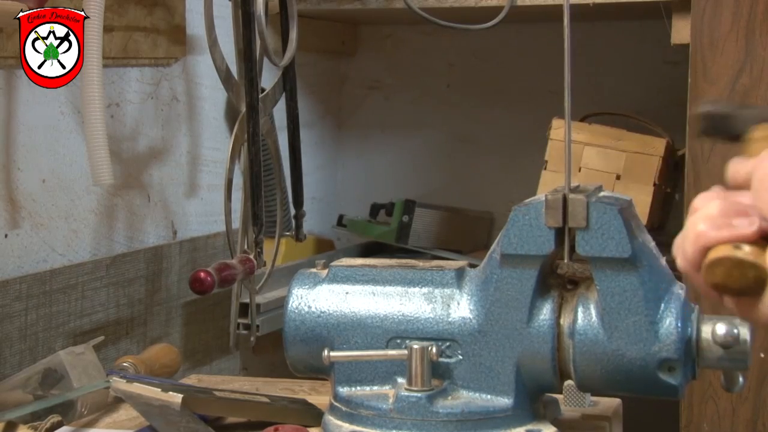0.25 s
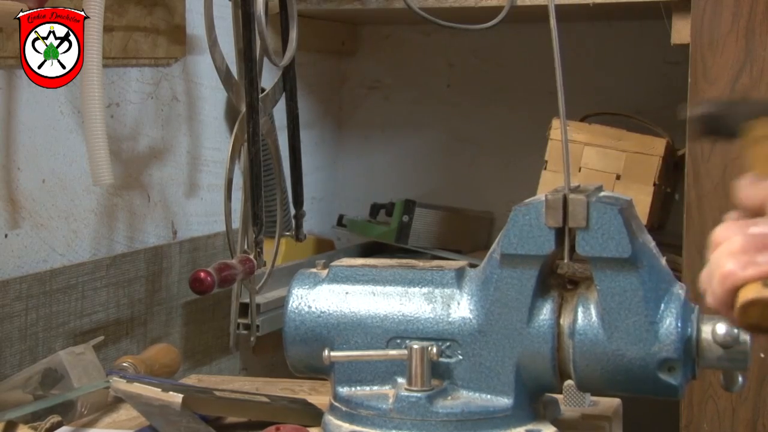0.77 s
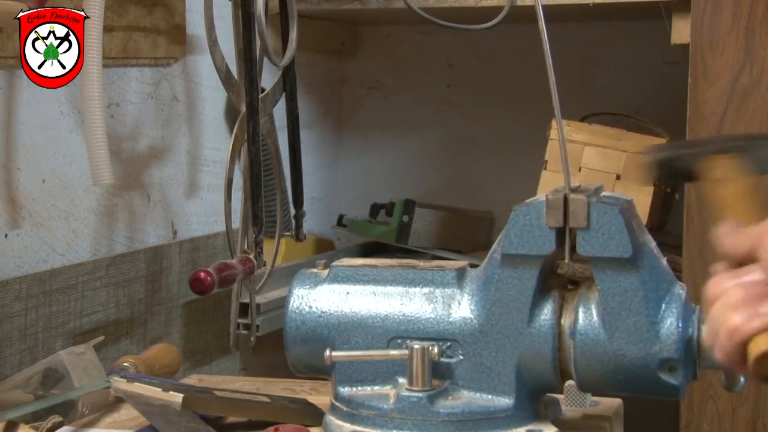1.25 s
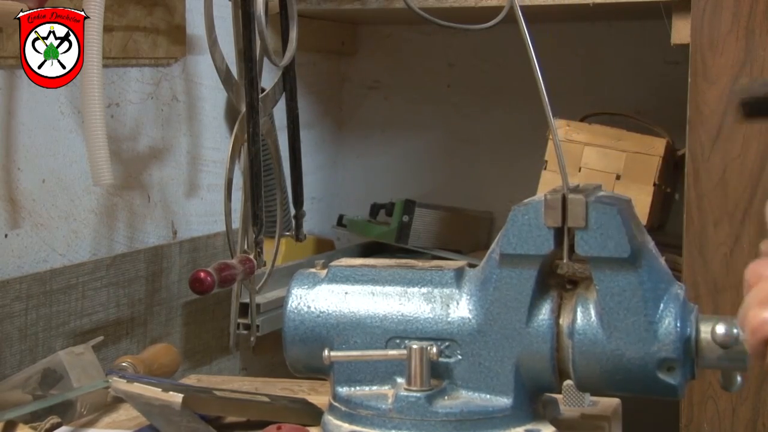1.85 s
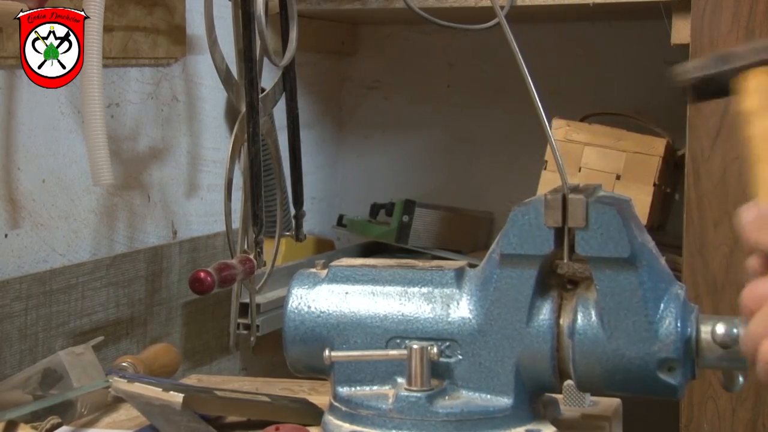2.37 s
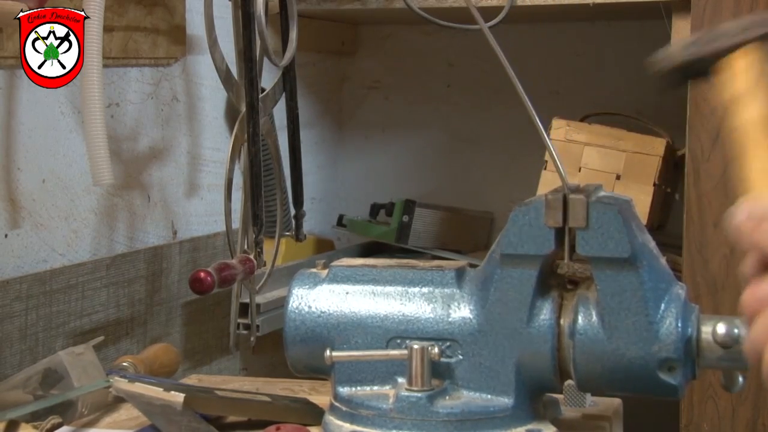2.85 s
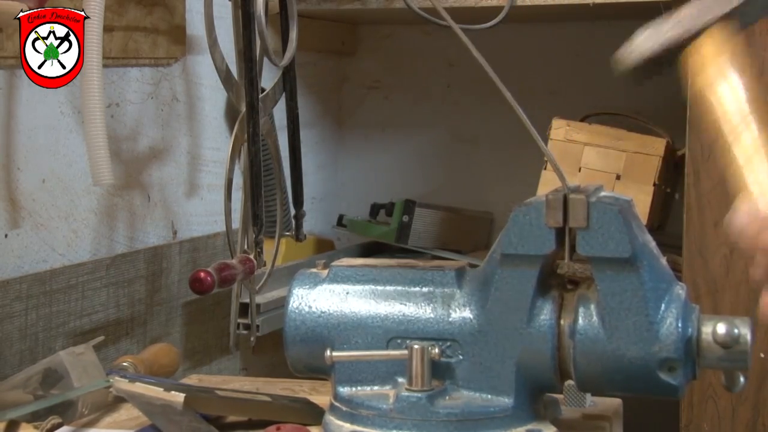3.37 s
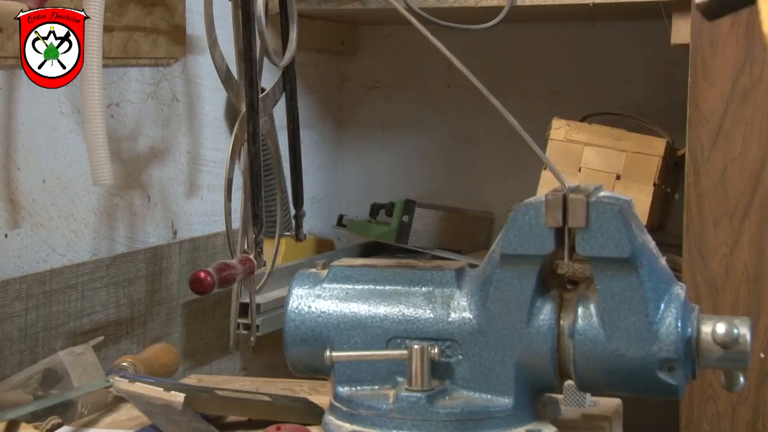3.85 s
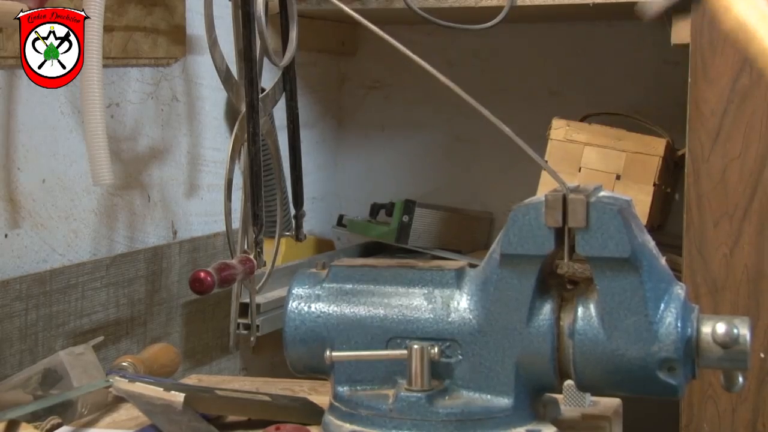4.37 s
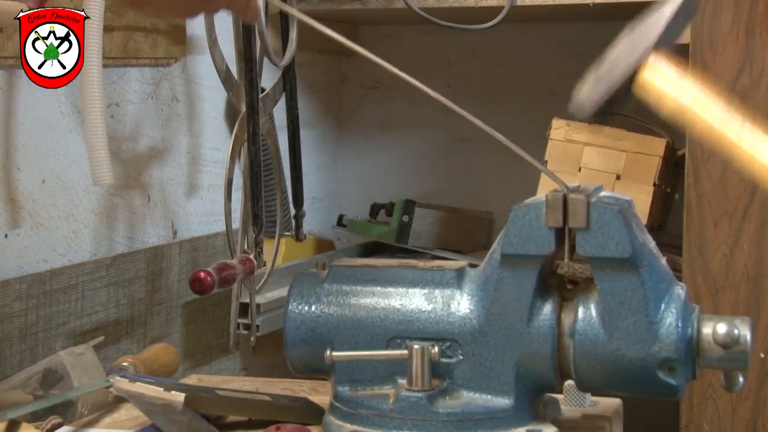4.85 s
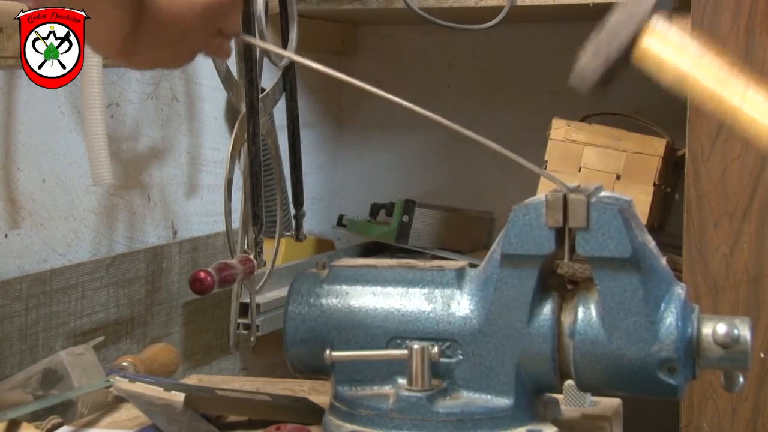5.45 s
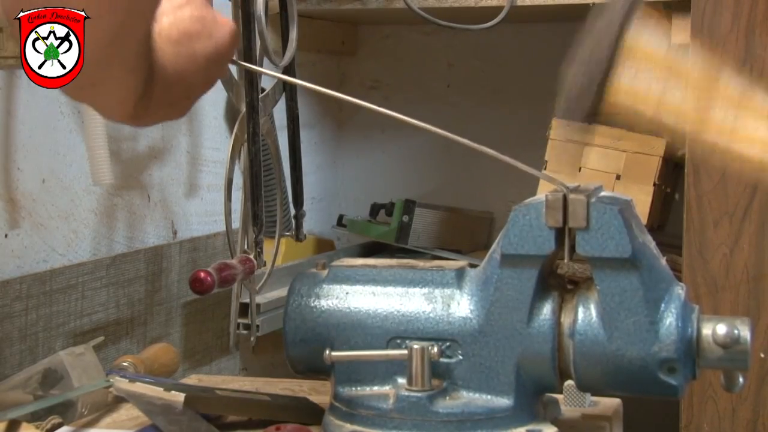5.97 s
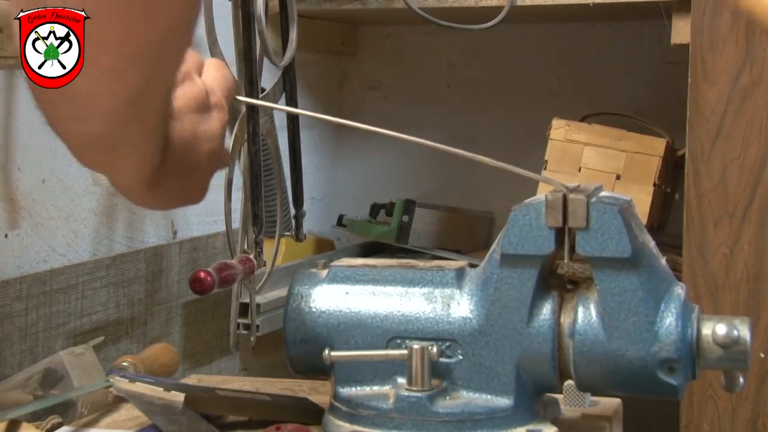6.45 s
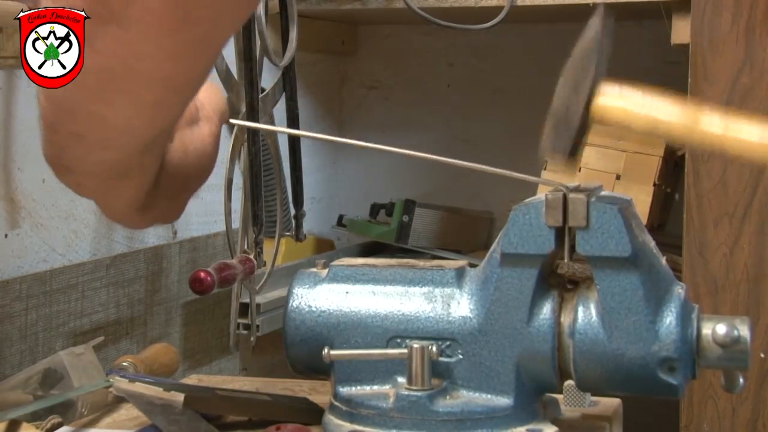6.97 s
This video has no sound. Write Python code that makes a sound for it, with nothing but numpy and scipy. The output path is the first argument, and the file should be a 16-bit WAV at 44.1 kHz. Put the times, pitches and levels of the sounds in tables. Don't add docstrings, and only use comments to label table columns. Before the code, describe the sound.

A steel hammer beats a thin rod clamped in a bench vise, about four sharp clanking blows per second, loose tools rattling, ending flatter and heavier.

```python
import sys
import numpy as np
from scipy import signal
from scipy.fft import rfft, irfft
from scipy.io import wavfile

SR = 44100
rng = np.random.default_rng(int(sys.argv[2]) if len(sys.argv) > 2 else 0)


def level_to_linear(level):
    exponent = np.asarray(level, float) / 20
    return 10 ** exponent


def file_out(sig):
    cols = np.atleast_2d(sig).T
    lim = np.clip(cols, -1, 1)
    pcm = np.round(lim * 32767).astype(np.int16)
    wavfile.write(sys.argv[1], SR, pcm)


N = 318402
LEAD = SR // 4

# start_s, slide_clank_db, vise_knock_db, crack_db
HAMMER_BLOWS = [(0.194, -9.5, -22.5, -22.5), (0.479, -7, -20.5, -20.5), (0.75, -10.5, -21, -22),
                (1.025, -11.5, -22, -25), (1.282, -16, -29, -27), (1.549, -13, -25, -26),
                (1.805, -17, -28, -25.5), (2.059, -17, -27, -25.5), (2.29, -18.5, -28, -26.5),
                (2.519, -18, -28, -24), (2.752, -13, -22.5, -23), (2.99, -9, -20, -22.5),
                (3.241, -15.5, -23.5, -23.5), (3.506, -15.5, -27, -25.5), (3.78, -11.5, -22, -22.5),
                (4.034, -12, -21, -22), (4.318, -11.5, -24, -22.5), (4.613, -9.5, -18.5, -20.5),
                (4.887, -8, -17, -19.5), (5.176, -8.5, -20, -20), (5.475, -8, -16, -21),
                (5.761, -7, -15, -21.5), (6.077, -10, -17.5, -23), (6.41, -4, -17, -20.5),
                (6.735, 0, -15.5, -20), (7.054, -0.5, -14.5, -20)]
# start_s, slide_clank_db, vise_knock_db, crack_db
BLOW_BEFORE = [
    (-0.056, -30, -44, -45),
]


def at_hz(points, hz):
    table_hz, values = np.transpose(points)
    return np.interp(np.log(hz), np.log(table_hz), values)


def colour(x, points):
    hz = np.maximum(np.fft.rfftfreq(4096, 1 / SR), 1)
    cepstrum = irfft(np.log(level_to_linear(at_hz(points, hz))))
    fold = cepstrum * np.r_[1, 2 * np.ones(2047), 1, np.zeros(2047)]
    impulse = irfft(np.exp(rfft(fold)))
    return signal.oaconvolve(np.atleast_2d(x), impulse[None], axes=1)[:, :x.shape[-1]]


def band(x, low_hz, high_hz):
    return signal.sosfilt(signal.butter(2, [low_hz, high_hz], "band", fs=SR, output="sos"), x)


def top_cut(x):
    return signal.sosfilt(signal.cheby2(10, 55, 15700, fs=SR, output="sos"), x)


def swell(x, seconds):
    r = np.exp(-1 / (seconds * SR))
    return signal.lfilter([1 - r], [1, -r], x)


def ring(clicks, hz, t60):
    r, w = level_to_linear(-60 / (max(t60, .003) * SR)), 2 * np.pi * hz / SR
    return signal.lfilter([0, np.sin(w)], [1, -2 * r * np.cos(w), r * r], clicks + 1e-18)


def strikes(times, heights):
    out = np.zeros(N + LEAD)
    np.add.at(out, np.round(np.asarray(times) * SR).astype(int) + LEAD, heights)
    return out


def dying(times, heights, t60):
    return signal.lfilter([1], [1, -level_to_linear(-60 / (t60 * SR))], strikes(times, heights) + 1e-18)


def grains(per_s, spread_db):
    sizes = level_to_linear(spread_db * np.minimum(rng.exponential(1, N + LEAD), 4))
    sizes = sizes * rng.choice([-1, 1], N + LEAD)
    clicks = sizes * (rng.random(N + LEAD) < per_s / SR)
    return clicks / clicks.std()


def work(s):
    # time_s, rod_bend [0-1], rod_and_tool_looseness_db, hammer_ring_against_crack_db
    states = [(-0.09, 1, -12.5, -14.5), (0.2, 0.28, -2, -22.5), (0.75, 0.22, -1.5, -6),
              (1.28, 0.14, 7.5, 2), (1.95, 0.35, 9, 6.5), (2.3, 0.03, 4, 2.5), (2.9, 0.39, -8, 2),
              (3.5, 0.24, -0.5, -3), (4.1, 0.41, -2, -19.5), (4.9, 0.6, -9, -27), (6.1, 0.59, -11, -25.5),
              (7.06, 0.97, -9.5, -21)]
    state_s, *columns = np.transpose(states)
    return [np.interp(s, state_s, column) for column in columns]


def swing_hammer():
    s, clank_db, knock_db, crack_db = np.transpose(BLOW_BEFORE + HAMMER_BLOWS)
    bend, loose_db, ring_db = work(s)
    chance = rng.standard_normal((len(s), 2))
    return dict(
        s=s + .0003,
        clank_db=clank_db, knock_db=knock_db, crack_db=crack_db, bend=bend, loose_db=loose_db,
        head_db=crack_db + ring_db,
        thud_db=-13 + 0.6 * (clank_db + knock_db) / 2 - 10 * bend,
        shudder_db=-4.5 + 0.28 * loose_db - 5 * bend,
        rebound_db=-9 + 0.27 * loose_db - 19 * bend,
        rebound_s=.031 + 0.011 * bend + 0.0053 * chance[:, 0],
        bright_db=7 - 13 * bend - 2.2 * chance[:, 1],
        chatter=grains(2500, 1.7))


def shudder(blow, level_db, t60):
    beats = dying(blow["s"] + 0.0078, level_to_linear(level_db + blow["shudder_db"]), t60)
    rebound_s = blow["s"] + blow["rebound_s"] - .003
    rebound = dying(rebound_s, level_to_linear(level_db + blow["rebound_db"] + 5.5), 0.045)
    return beats + swell(rebound, .003)


def wide_noise(width):
    return rng.standard_normal((2, N + LEAD)) * [[1], [width]]


def burst(blow, level_db, t60, width):
    return wide_noise(width) * swell(dying(blow["s"], level_to_linear(level_db), t60), 0.0016)


def body(modes, times, level_db, after, scatter_db, width):
    scatter = rng.standard_normal((len(times), len(modes)))
    aims, out = width * rng.standard_normal(len(modes)), 0
    for k, (hz, mode_db, t60) in enumerate(modes):
        hit = strikes(times, level_to_linear(level_db + scatter_db * scatter[:, k]))
        tone = (-1) ** (k // 2) * level_to_linear(mode_db) * ring(hit + after, hz, t60)
        side = aims[k] * np.roll(tone, int(SR / hz / 6))
        out = out + np.array([tone, side])
    return out


def still_air():
    # pitch_hz, level_db [dB per Hz]
    hush = [(40, -8), (150, -1.5), (500, -10.5), (1200, -8.5), (3400, -23.5), (8000, -18.5), (14000, -35.5)]
    common, own = rng.standard_normal(N + LEAD), rng.standard_normal((2, N + LEAD))
    air = colour(common + .4 * own, hush)
    return air / air.std()


def spark(blow):
    spark_db = blow["crack_db"] + blow["bright_db"] + .6 * blow["loose_db"] - 7
    return band(burst(blow, spark_db, .006, width=.15), 13800, 16800)


def crack(blow):
    # pitch_hz, level_db
    crack_curve = [(700, -4), (1500, 1.5), (3000, 1.5), (5000, 1.5), (8000, 2), (13000, -11.5),
                   (15000, -19), (16500, -28)]
    crack_db = blow["crack_db"]
    buzz = wide_noise(.25) * shudder(blow, crack_db - 2.5, 0.19)
    slap = colour(burst(blow, crack_db + 3.5, 0.03, width=.25) + buzz, crack_curve)
    spit = band(burst(blow, crack_db + blow["bright_db"] + 8, 0.017, width=.15), 9500, 13000)
    return slap + spit


def jaws(blow):
    # pitch_hz, level_db, t60_s
    jaw_modes = [(2690, -3, 0.054), (2940, -5, 0.049), (3260, -3.5, .02), (4208, -2, .03),
                 (6060, -0.5, .012), (6716, -2.5, 0.028)]
    after = blow["chatter"] * shudder(blow, blow["crack_db"] - 27, 0.18)
    return body(jaw_modes, blow["s"] + 0.00079, blow["crack_db"] - 6, after, scatter_db=-2.0, width=.25)


def slide(blow):
    # pitch_hz, level_db, t60_s
    slide_modes = [(920, 6.5, 0.016), (1064, -8.5, 0.014), (1168.5, 1.5, 0.014), (1330, -1, 0.019),
                   (1640, -8.5, 0.027), (1734, -3.5, 0.017), (1833, -5, 0.029)]
    after = blow["chatter"] * shudder(blow, blow["clank_db"] - 34, 0.14)
    return body(slide_modes, blow["s"] + 0.00083, blow["clank_db"] - 22, after, scatter_db=0.5, width=0.43)


def clank(blow):
    return band(burst(blow, blow["clank_db"], 0.036, width=0.52), 800, 2200)


def vise(blow):
    # pitch_hz, level_db, t60_s
    vise_modes = [(429.6, 2.5, 0.04), (461, -15.5, 0.078), (532.5, -0.5, 0.061), (591.4, 0, 0.04),
                  (658.5, -4, 0.03), (753, 0, 0.03), (849, -4, 0.047)]
    knock_db = blow["knock_db"]
    knock = band(burst(blow, knock_db + 12.5, 0.031, width=0.16), 400, 860)
    after = blow["chatter"] * shudder(blow, knock_db - 24, 0.23)
    return knock + body(vise_modes, blow["s"] + 0.00096, knock_db - 2, after, scatter_db=1.5, width=0.4)


def hammer_head(blow):
    # pitch_hz, level_db, t60_s
    head_modes = [(4270, -6, .03), (6900, -9, .015), (7910, -11, .025), (8350, -4, .022), (9060, -5, .03),
                  (9140, -3, .09), (9165, -13, .16), (10300, -13, .015), (11500, -12, .015)]
    after = blow["chatter"] * shudder(blow, blow["head_db"] - 32, 0.021)
    return body(head_modes, blow["s"] + 0.0012, blow["head_db"] - 0.5, after, scatter_db=-1.5, width=.1)


def bench(blow):
    # pitch_hz, level_db, t60_s
    bench_modes = [(66, -30, .3), (106, -20, .16), (135, -19, .14), (193, -2.5, .13), (222, -10, .15),
                   (254, 0, .14), (290, -7, .16), (316, -6, .14), (350, -3, .14), (385, -4, .13)]
    thud_db = blow["thud_db"]
    after = blow["chatter"] * shudder(blow, thud_db - 31.5, 0.26)
    thud = body(bench_modes, blow["s"] + .0015, thud_db + 0.5, after, scatter_db=0.5, width=0.22)
    rumble = band(burst(blow, thud_db - 12 * blow["bend"] + 4, .4, width=.2), 40, 160)
    return signal.lfilter([.05], [1, -.95], thud) + rumble


def rattle():
    # start_s, level_db
    shakes = [
        (1.2, -60),
        (1.43, -58),
        (1.96, -55),
        (2.03, -60),
        (2.25, -55),
        (2.46, -62),
        (3.68, -68),
        (4.2, -64),
    ]
    s = np.transpose(BLOW_BEFORE + HAMMER_BLOWS)[0]
    rattle_db = -13.5 + work(s)[1]
    after_blow = swell(dying(s, level_to_linear(rattle_db - 54), .6), .02)
    shake_s, shake_db = np.transpose(shakes)
    late = swell(dying(shake_s, level_to_linear(shake_db - 19.5), 0.15), .004)
    hops = grains(3000, 0.85) * (after_blow + late)
    out = level_to_linear(-3.5) * band(band(hops, 3500, 11500), 3500, 11500)
    dealt = rng.integers(0, 20, N + LEAD)
    for k, hz in enumerate(np.geomspace(260, 3300, 20)):
        out = out + ring(hops * (dealt == k), hz, 18 / hz) * (hz / 1000) ** .3
    return out


def room(x):
    # pitch_hz, t60_s
    decay = [(80, 0.06), (210, 0.33), (560, 0.39), (1470, 0.21), (3880, 0.26), (8000, 0.14), (13000, 0.045)]
    # pitch_hz, level_db
    strength = [(100, -7), (250, -7.5), (600, -26), (1500, 5.5), (4000, -0.5), (8000, -6), (15000, -27.5)]
    # pitch_hz, likeness [0-1]
    likeness = [(100, 0.97), (300, 0.26), (700, 0.44), (1500, 0.76), (3500, 0.28), (7000, 0.86),
                (14000, 0.87)]
    t = np.arange(SR // 2) / SR
    white = rng.standard_normal((2, 2, len(t)))
    edges, echo = 60 * 2 ** np.arange(0, 8.6, .5), 0
    for k, (low, high) in enumerate(zip(edges, edges[1:])):
        mid, side = band(white[k % 2], low, min(high, .45 * SR))
        hz = np.sqrt(low * high)
        alike = np.clip(at_hz(likeness, hz), 0, 1)
        fall = level_to_linear(at_hz(strength, hz) - 60 * t / at_hz(decay, hz))
        echo = echo + fall * (np.sqrt(1 + alike) * mid + np.sqrt(1 - alike) * side * [[1], [-1]])
    echo = echo * (1 - np.exp(-t / 0.0047))
    return signal.oaconvolve(x[None], echo, axes=1)[:, :len(x)]


def scattered_room(x):
    t = (np.arange(len(x)) - LEAD) / SR
    turn = np.searchsorted(np.transpose(HAMMER_BLOWS)[0], t + .002) % 3
    sent = x * level_to_linear(-7.5 * work(t)[0])
    return sum(room(sent * (turn == k)) for k in range(3))


def clinks():
    # start_s, ring_db, pitch_hz, t60_s, tick_db
    touches = [(.1033, -68, 7700, .008, -72), (.464, -70, 2300, .03, -85), (.70, -56, 1800, .025, -68),
               (.955, -76, 6800, .06, -90), (.969, -61, 1900, .02, -70), (1.242, -57, 1780, .025, -68),
               (1.411, -62, 6000, .008, -60), (1.4642, -62, 7000, .01, -64), (1.504, -52, 1800, .035, -68),
               (1.727, -60, 1770, .025, -72), (1.772, -52, 1780, .03, -66), (1.939, -52, 4200, .04, -58),
               (1.99, -62, 8200, .018, -68), (2.203, -62, 8000, .01, -64), (2.251, -58, 2500, .015, -64),
               (2.332, -42, 7000, .015, -50), (2.886, -54, 1750, .03, -68), (3.192, -65, 2350, .12, -72),
               (3.435, -66, 2360, .06, -80), (4.012, -59, 1800, .02, -64), (4.222, -64, 1000, .03, -72),
               (4.287, -70, 3000, .012, -70), (4.835, -69, 1800, .02, -76)]
    rings = sum(ring(strikes([s], level_to_linear(db + 6)), hz, t60) for s, db, hz, t60, _ in touches)
    s, tick_db = np.transpose(touches)[[0, 4]]
    ticks = rng.standard_normal(N + LEAD) * dying(s, level_to_linear(tick_db - 1), .018)
    return rings + band(ticks, 900, 8000)


def ringing_tools():
    # start_s, peak_db, pitch_hz, t60_s
    lingering = [(1.03, -54, 5845, .35), (1.14, -62, 2510, 1.8), (1.83, -47, 2945, .2),
                 (2.255, -84, 5810, .5), (2.525, -57, 1949, 1.0), (3.515, -42, 1799, .28),
                 (4.33, -41, 2994, .2), (4.325, -58, 1946, .65), (4.895, -59, 1946, .65),
                 (5.18, -56, 2546, .45), (5.18, -59, 1946, .6), (6.42, -50, 3452, .35)]
    return sum(ring(strikes([s], level_to_linear(db)), hz, t60) for s, db, hz, t60 in lingering)


def scene():
    # pitch_hz, left_minus_right_db
    port_balance = [(80, -2.5), (200, -2.5), (380, -1.5), (700, 1.5), (1290, 1.5), (2380, 1.5), (4400, -1),
                    (15000, 2.5)]
    blow = swing_hammer()
    heavy = top_cut(crack(blow) + slide(blow) + vise(blow) + bench(blow)) + spark(blow)
    bright = top_cut(jaws(blow) + clank(blow) + hammer_head(blow))
    small = clinks()
    mid = heavy[0] + rattle()
    echo = top_cut(scattered_room(mid + level_to_linear(-6.5) * bright[0] + level_to_linear(-12.5) * small))
    near = mid + bright[0] + small + ringing_tools()
    side = heavy[1] + bright[1]
    left, right = near + side * [[1], [-1]] + level_to_linear(-29.5) * echo
    left = colour(left, [(hz, db / 2) for hz, db in port_balance])[0]
    right = colour(right, [(hz, -db / 2) for hz, db in port_balance])[0]
    return (np.array([left, right]) + level_to_linear(-84) * still_air())[:, LEAD:]


def band_limit(x):
    return signal.sosfilt(signal.butter(12, 17150, fs=SR, output="sos"), x)


def record(dry):
    x = signal.sosfilt(signal.butter(3, 95, "high", fs=SR, output="sos"), dry)
    headroom = .65
    x = headroom * np.tanh(x / headroom)
    x = signal.sosfilt(signal.cheby2(10, 60, 17200, fs=SR, output="sos"), x)
    return band_limit(x)


dry = scene()
out = record(dry)
file_out(out)
```